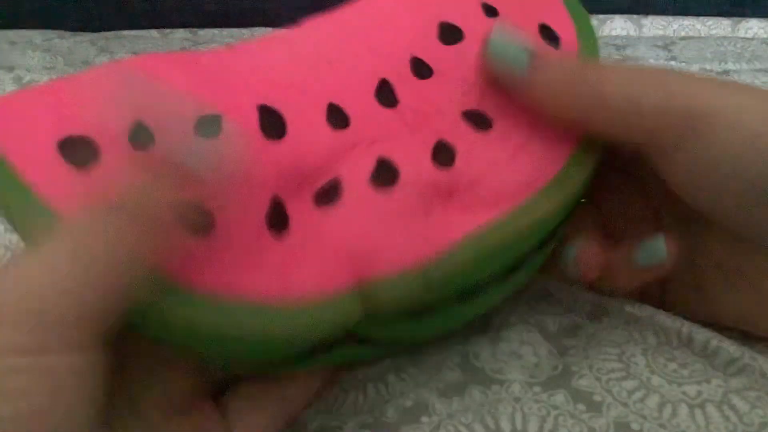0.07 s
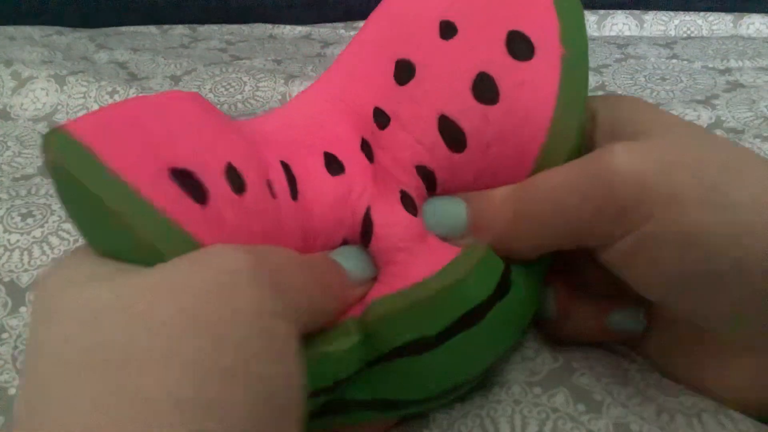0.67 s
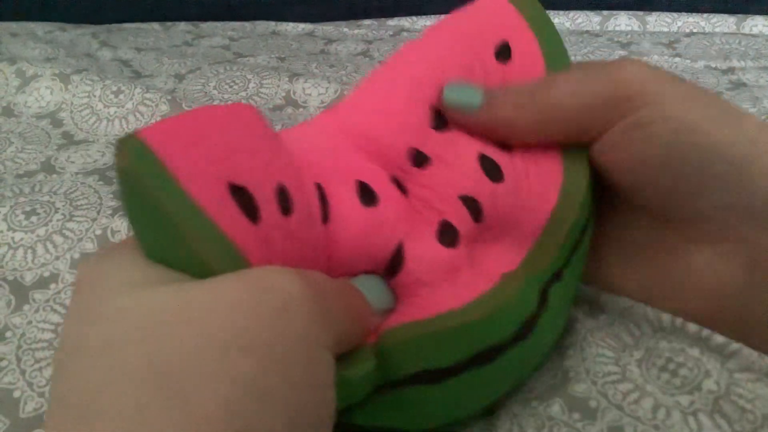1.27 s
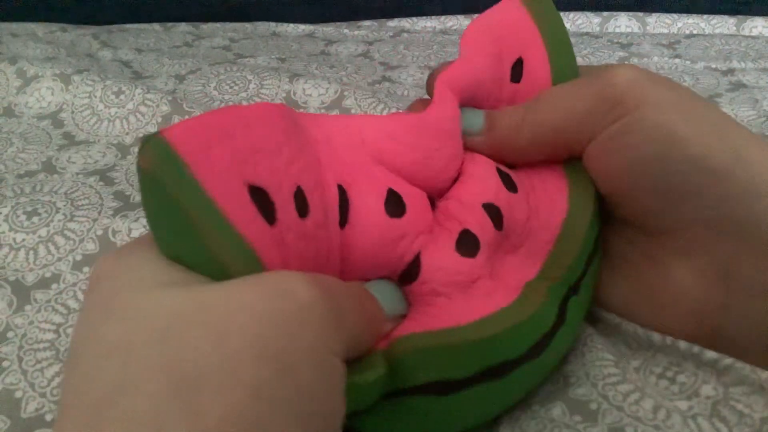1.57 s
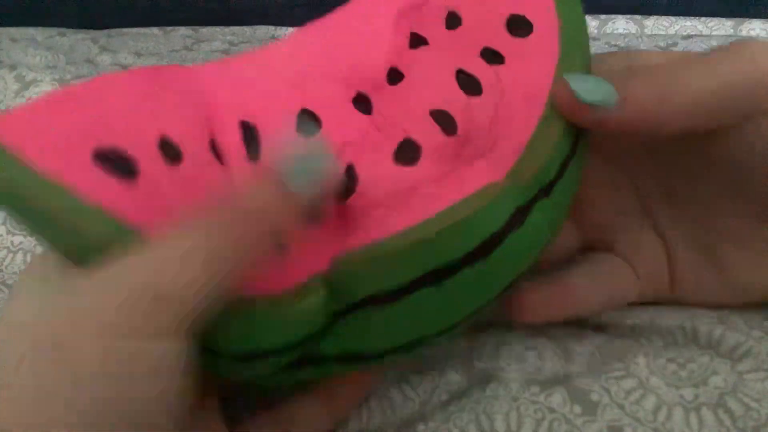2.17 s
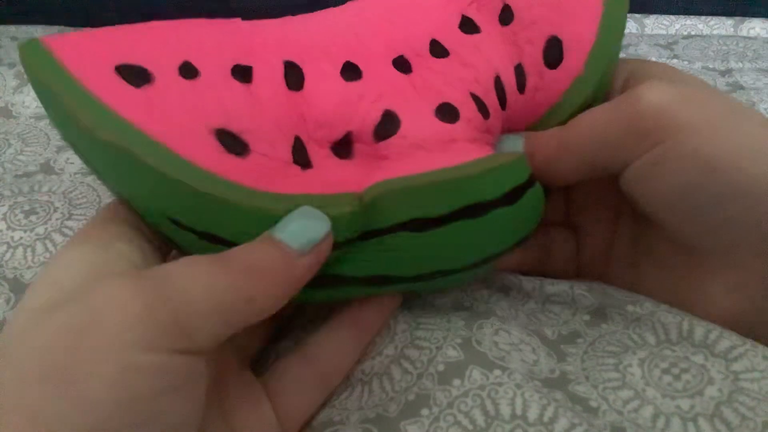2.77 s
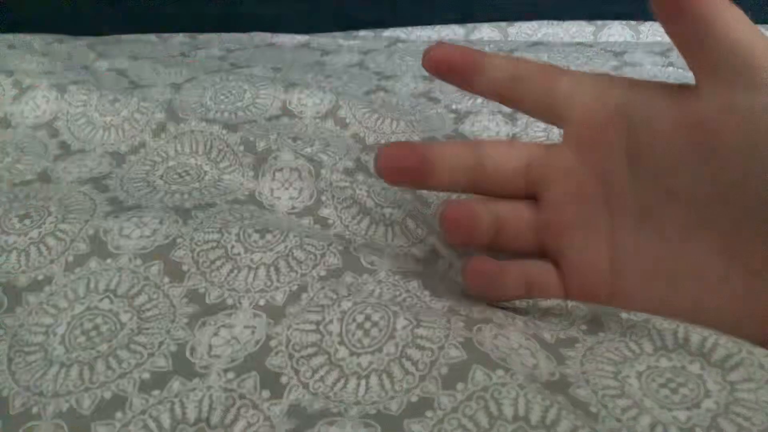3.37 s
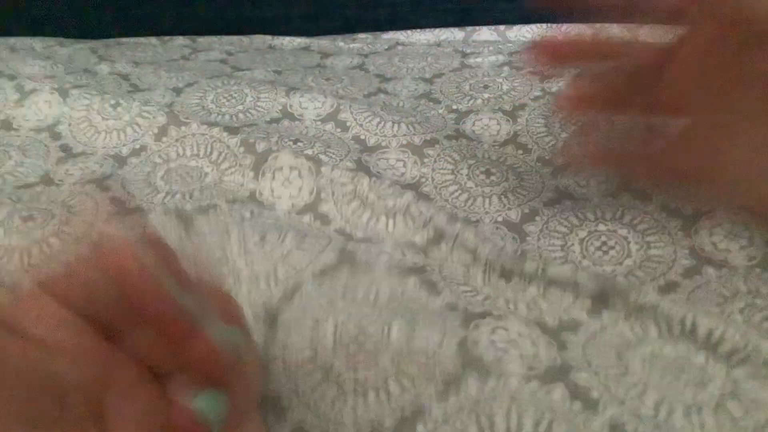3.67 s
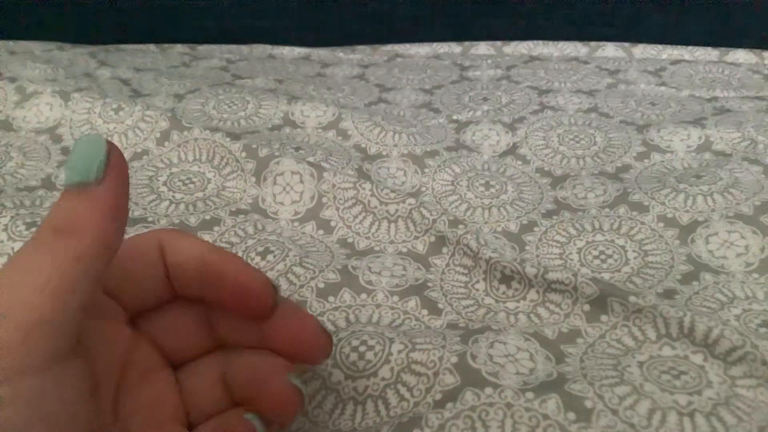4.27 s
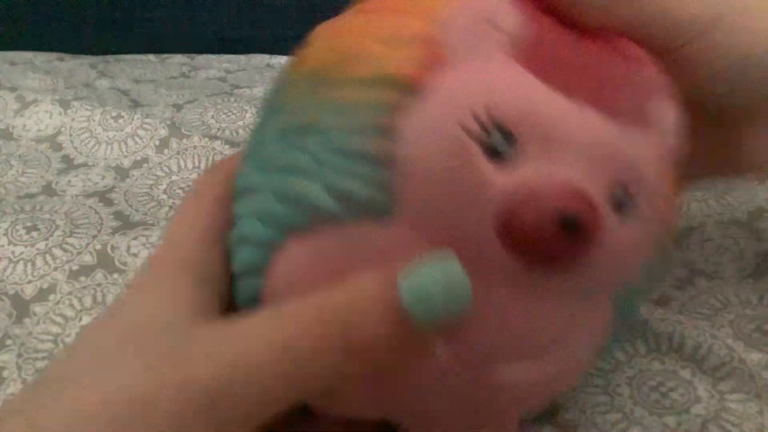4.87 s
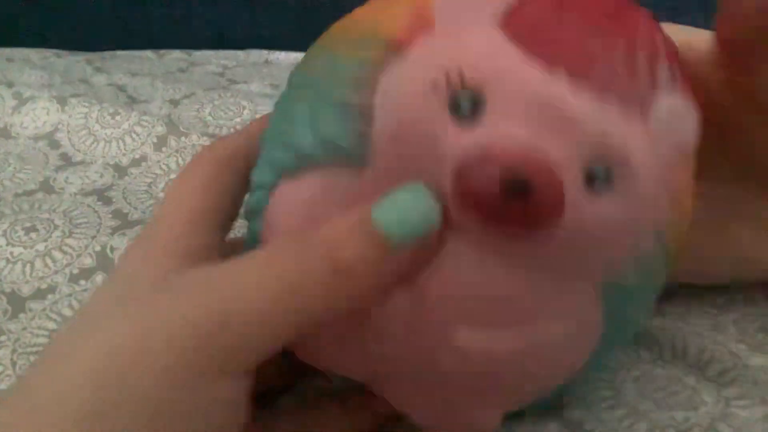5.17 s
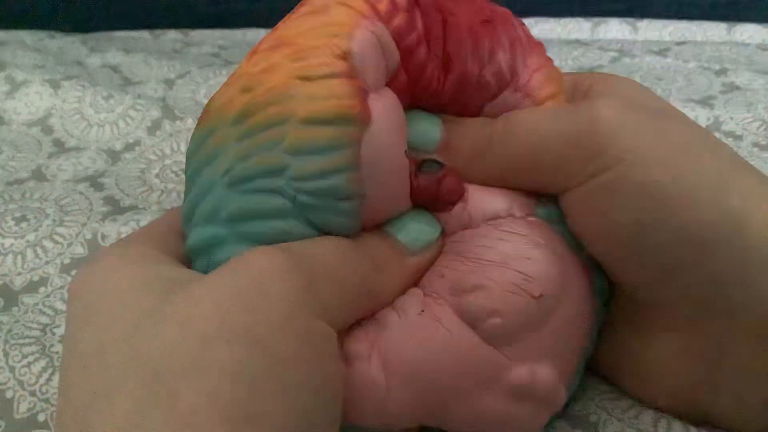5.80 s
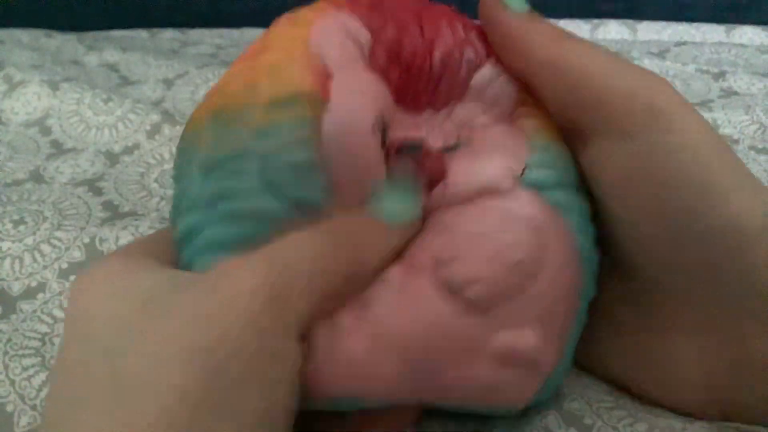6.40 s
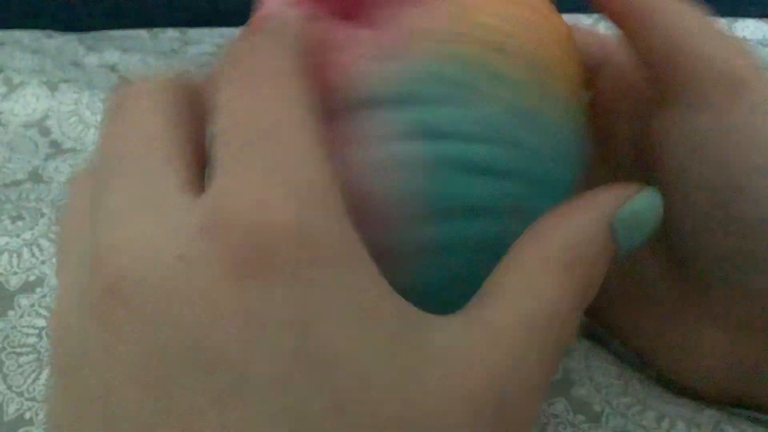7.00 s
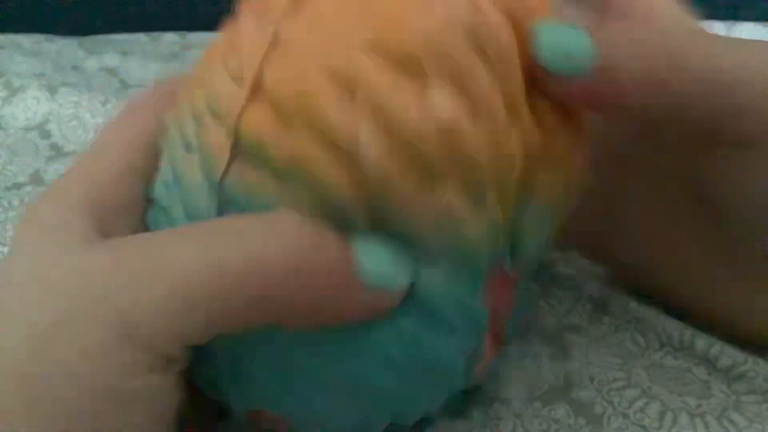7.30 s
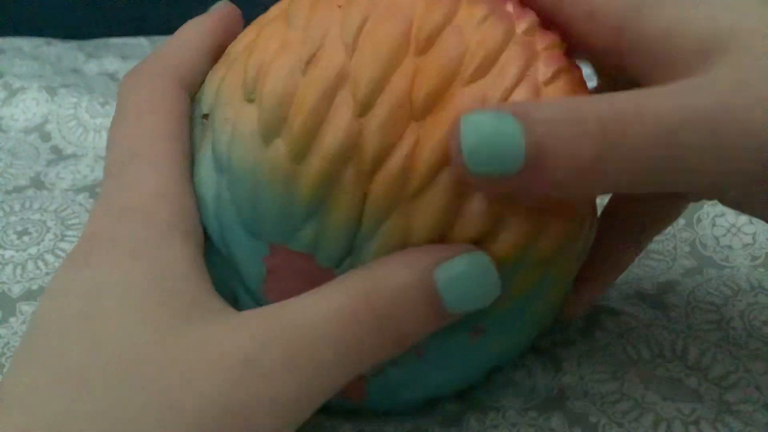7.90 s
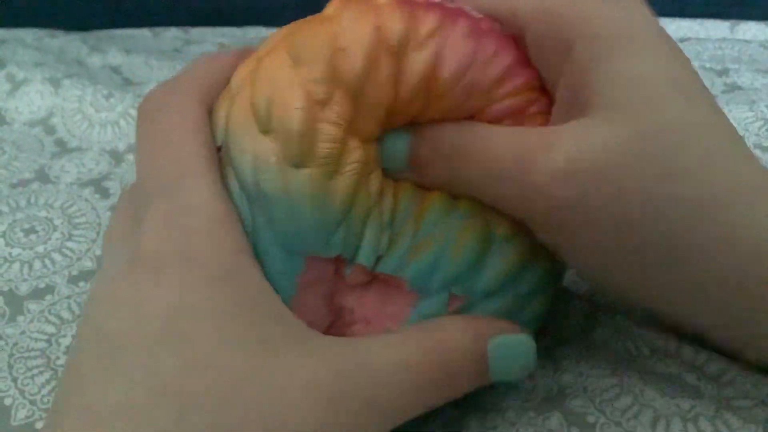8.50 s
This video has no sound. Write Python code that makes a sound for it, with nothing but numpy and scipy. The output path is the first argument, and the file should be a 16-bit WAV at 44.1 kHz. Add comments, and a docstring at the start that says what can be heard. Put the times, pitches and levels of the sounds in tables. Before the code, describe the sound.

Two hands rub and squeeze a soft foam toy over a cloth-covered bed, close to the microphone in a small, quiet room. Skin hisses in uneven swells over a low foam murmur, and fingertips peel off with small pops and cracks. Near the middle come a few dull bumps and a brief lull. Then a second toy is squeezed and turned, with more rubbing, faint creaks and sticky snaps.

```python
"""Two hands rub, squeeze and turn soft foam toys over a cloth-covered bed, close to a mono microphone.
Skin hisses over the rubbery coat and the cloth, and the foam murmurs under the fingers. Fingertips
stick, slip and peel off with small pops and cracks; each slip runs through the toy as a short falling
chirp. Toys and hands land with dull bumps. Behind it all is the faint air of a small room."""
import sys
import numpy as np
from scipy import signal
from scipy.fft import rfft, irfft, next_fast_len
from scipy.io import wavfile

SR = 44100
rng = np.random.default_rng(int(sys.argv[2]) if len(sys.argv) > 2 else 0)


def transcribe(u):
    """Save the signal u as a 16-bit wav file named by the first command-line argument.

    u: samples, shape (n,) or (channels, n), limited to [-1, 1]; the rate is SR.
    q: integer samples, one column per channel.
    """
    v = np.clip(np.atleast_2d(u).T, -1, 1)
    q = np.round(v * 32767).astype(np.int16)
    wavfile.write(sys.argv[1], SR, q)


N = 381465
T = np.arange(N) / SR

# A hand slides over foam or cloth: start_s, length_s, rise_share, coarse_db, fine_above_coarse_db
SLIDES = [(-.058, 0.41, 0.56, -52.5, -4), (.252, 0.55, 0.37, -52, 0), (.537, 0.29, 0.68, -56.5, 3.5),
          (.794, 0.35, .28, -54.5, -2.5), (1.086, 0.35, 0.28, -57, -1.5), (1.332, 0.21, 0.13, -66, -4.5),
          (1.609, 0.4, 0.47, -52, -2.5), (1.947, 0.28, 0.17, -64, -6), (2.041, 0.26, 0.35, -54.5, -0.5),
          (2.207, 0.3, 0.5, -55, -2.5), (2.46, 0.38, 0.26, -56.5, -4.5), (2.74, 0.16, .5, -73, -6),
          (2.887, 0.25, 0.49, -58.5, -5.5), (3.121, 0.21, 0.56, -58.5, -3.5), (3.27, .2, 0.35, -60.5, -7.5),
          (3.488, 0.23, 1, -54.5, -4.5), (3.583, 0.39, 0.47, -50, -2), (3.873, 0.19, 0.86, -78, 3.5),
          (4.25, 0.18, 0.76, -65, -2.5), (4.425, 0.23, 0.88, -56, -3.5), (4.58, 0.18, 0.72, -58, -3),
          (4.648, 0.22, 0.79, -53.5, -1), (4.847, 0.35, 0.11, -55.5, -2.5), (5.097, 0.31, 0.56, -51, -0.5),
          (5.33, .2, 0.36, -55.5, -3), (5.428, 0.42, 0.41, -51, 1.5), (5.758, 0.53, 0.12, -64, -4),
          (5.922, 0.21, 0.61, -56, -3.5), (6.05, .22, .4, -74, 1), (6.22, 0.22, 0.46, -65.5, 3.5),
          (6.328, 0.2, 0.54, -53, -2), (6.44, 0.18, 0.31, -69, -1.5), (6.556, 0.37, 0.47, -53.5, -2),
          (6.77, 0.48, 0.42, -58, -1.5), (7.076, 0.41, 0.54, -52.5, -0.5), (7.416, 0.14, 0.36, -57, 3),
          (7.513, 0.15, 0.49, -55, -0.5), (7.62, 0.4, 0.38, -61.5, 0), (7.946, 0.27, 0.43, -57.5, -3),
          (8.138, 0.44, 0.066, -61.5, -6), (8.442, 0.25, 0.48, -57.5, -2.5)]
# Fingers press the foam and let go: start_s, length_s, rise_share, pressure_db, sway_above_pressure_db
SQUEEZES = [(-.026, 0.38, 0.36, -59.5, 3), (.29, 0.31, 0.34, -55.5, 1), (.561, 0.38, 0.44, -57.5, 1.5),
            (.833, 0.25, 0.13, -54.5, 1.5), (1.119, 0.22, .75, -57.5, 5), (1.27, 0.64, .3, -70.5, 4),
            (1.636, 0.39, 0.3, -57, 2.5), (1.999, 0.45, 0.31, -58.5, 3), (2.47, 0.33, 0.16, -64, 2),
            (2.93, 0.39, 0.21, -66.5, 3), (3.15, 0.44, 0.27, -59, 1), (3.31, 0.078, 0.48, -52.5, -10),
            (3.62, 0.093, 0.28, -46, 0), (3.6, .42, 0.27, -53, 2.5), (4.08, 0.39, 0.34, -65.5, 2.5),
            (4.43, 0.34, 0.83, -57, -4.5), (4.742, 0.37, .24, -51.5, 2), (5.097, 0.4, 0.29, -52.5, -.5),
            (5.28, 0.56, 0.69, -52.5, -5.5), (5.68, 0.31, 0.79, -57, 0.5), (5.95, 0.23, 0.29, -55.5, -4),
            (6.29, 0.27, 0.52, -54.5, -2), (6.59, 0.64, .16, -54, -1.5), (7.08, 0.79, 0.2, -54, -1.5),
            (7.5, 0.2, 0.65, -56, 4.5), (7.722, 0.24, 0.55, -55.5, 8), (7.98, .34, 0.21, -50, -4.5),
            (8.3, 0.13, 0.36, -65.5, 8), (8.42, .14, 0.34, -61.5, 6), (8.52, 0.21, 0.55, -54, -4)]
# The tone of sliding skin, pressed foam, swaying foam and one slip: frequency_hz, level_db
HISS_TONE = [(150, -37), (500, 3), (1000, 0.5), (1400, 0.5), (1750, -0.5), (2200, 1), (3300, 0),
             (4800, 1.5), (6500, -0.5), (7700, 0), (9800, 0), (12300, -5.5), (14000, -3.5), (15600, -3.5)]
FOAM_TONE = [(60, -27), (150, 2.5), (200, 4), (280, 0.5), (370, 1.5), (470, -0.5), (570, -2), (720, -6),
             (1000, -15), (1800, -55), (5000, -54)]
SWAY_TONE = [(20, -42), (35, -35), (50, -8), (70, -0.5), (125, -4.5), (190, -11.5), (320, -25.5),
             (900, -47)]
SLIP_TONE = [(30, -40), (70, -4), (150, -1.5), (300, 3), (550, 3.5), (1000, -5), (2200, -6.5), (4500, -7.5),
             (7000, -19.5), (12000, -29), (15600, -4)]
# A fingertip breaks loose: time_s, level_db, brightness_hz
SLIPS = [(.3976, -44, 1200), (.4083, -39.5, 1000), (.6908, -48.5, 2000), (.8046, -44, 3500),
         (.8255, -45, 7520), (.9128, -36.5, 3500), (1.6455, -51, 4000), (1.693, -26.5, 6880),
         (1.6938, -26.5, 5060), (1.6978, -30, 9000), (1.7253, -40, 3970), (1.885, -43.5, 1490),
         (1.9806, -45, 1100), (2.1217, -44.5, 3020), (2.1492, -28, 3320), (2.202, -32, 1660),
         (3.0001, -38.5, 4070), (3.0029, -39, 3440), (3.3407, -41, 650), (3.5112, -48.5, 5000),
         (3.526, -47.5, 4050), (3.6361, -37, 600), (3.6667, -31, 400), (3.6734, -35, 350),
         (3.767, -38.5, 350), (4.8147, -38, 1300), (4.8213, -42, 3930), (4.9307, -37.5, 600),
         (5.166, -41, 500), (5.1823, -44, 600), (5.2265, -33.5, 355), (5.414, -43.5, 1000),
         (5.4655, -45, 550), (5.6316, -43, 1200), (5.891, -50, 2000), (6.043, -37.5, 2530),
         (6.0571, -40, 2520), (6.0621, -39.5, 2000), (6.4052, -33, 7500), (6.4245, -27, 6980),
         (6.493, -41, 2800), (7.034, -42, 7020), (7.254, -42.5, 1600), (7.379, -38, 460), (7.452, -42, 700),
         (7.6042, -43, 3960), (7.623, -45, 2000), (7.7239, -48, 2500), (7.79, -48, 5060),
         (7.882, -42, 4900), (8.0152, -40, 800), (8.3061, -49, 6030), (8.3212, -43.5, 1400),
         (8.618, -40, 900), (8.6246, -14.5, 15300)]
# A fingertip skids in a run of slips: start_s, end_s, slips_per_s, level_db, hardest_at_share, brightness_hz
SKIDS = [(1.251, 1.2887, 78, -36, 1, 940), (2.735, 2.7913, 55, -47.5, 1, 2520),
         (6.3387, 6.392, 75, -27.5, 0.4, 3150), (8.56, 8.601, 129, -39, 0.9, 1600)]
# A thumb drags in quick small slips: start_s, end_s, slips_per_s, level_db, brightness_hz
CREAKS = [(.385, 0.471, 124, -50, 750), (2.521, 2.595, 190, -55.5, 600), (5.379, 5.489, 101, -51.5, 800),
          (6.635, 6.86, 70, -66, 900), (7.442, 7.527, 150, -55, 900), (7.827, 7.896, 110, -60, 2500),
          (8.011, 8.288, 121, -56.5, 1100)]
# Sticky skin peels off the coat: release_s, level_db, build_up_s
PEELS = [(.918, -41.5, 0.014), (1.697, -39, 0.0021), (1.7019, -31.5, 0.0012), (2.152, -34, 0.0033),
         (2.168, -52, .01), (2.775, -68, 0.021), (3.005, -41.5, 0.0064), (3.346, -50, 0.01),
         (3.53, -67, 0.0064), (3.673, -41.5, 0.0044), (4.825, -44.5, 0.022), (6.045, -47, 0.0054),
         (6.067, -44.5, 0.009), (6.429, -44, .003), (7.625, -66, .015), (7.87, -62, 0.045),
         (8.603, -42.5, 0.0069), (8.626, -34.5, 0.0019)]
# An air pocket opens between skin and foam: time_s, level_db, pitch_hz
POPS = [(.4125, -38, 448), (1.2660, -43, 623), (1.2785, -37, 624), (2.535, -44, 548), (2.555, -44, 600),
        (3.6428, -27, 304), (4.1, -44, 587), (5.2272, -26, 786), (5.4705, -35, 482), (5.8922, -45.5, 508),
        (6.4268, -25, 595), (6.5650, -49, 557), (8.6037, -30.5, 482), (8.6282, -31.5, 475)]
# The coat snaps free of the skin: start_s, crack_db, ring_db
CRACKS = [(.9138, -38, -32), (1.6925, -25, -36), (1.694, -34, -36), (1.6988, -35, -49),
          (2.1487, -26, -37.5), (3.0020, -33, -30.5), (6.0430, -45, -40.5), (6.424, -23.5, -31.5),
          (7.0335, -44, -54), (7.8825, -51, -46.5), (8.6238, -32, -36)]
# The notes the tight coat rings with: pitch_hz, level_db, ring_s (time to fade by 60 dB)
COAT_NOTES = [(720, 0, 0.012), (1400, -2, 0.018), (2254, 2.5, 0.0078), (2900, -15, 0.0035),
              (4700, -6.5, 0.0079)]
# A hand or toy bumps the foam or the bed: peak_s, level_db, pitch_hz
BUMPS = [(.095, -45, 111), (.336, -42.5, 93), (.448, -42, 98), (.926, -42, 131), (.975, -43, 122),
         (1.289, -47, 103), (1.709, -30, 140), (1.909, -43.5, 90), (2.179, -37.5, 79), (3.019, -39, 94),
         (3.14, -50, 90), (3.656, -27, 134), (3.675, -31, 63.7), (3.691, -29, 178), (3.713, -36, 104),
         (3.773, -35, 137), (3.835, -33, 81.5), (4.825, -35, 116), (4.864, -33, 71), (4.971, -41, 114),
         (5.198, -34, 147), (5.248, -41, 117), (5.93, -43.5, 121), (6.079, -36, 107), (6.372, -35, 89),
         (6.406, -31.5, 76.5), (6.444, -39, 85), (6.464, -40.5, 77), (6.512, -43, 106), (7.058, -41.5, 89),
         (7.405, -31, 75), (7.814, -39, 101), (7.855, -38, 118), (7.897, -40, 113), (8.126, -41, 109),
         (8.642, -41, 102)]
# A dragging finger rasps in the hollow of the hand: peak_s, level_db, width_s, resonance_hz
RASPS = [(.51, -53.5, .05, 5400), (.9, -50, 0.046, 1400), (.89, -59, 0.039, 2130),
         (2.755, -64, 0.023, 1280), (3.0, -46.5, 0.02, 1400), (3.52, -72, 0.012, 2900),
         (4.028, -65, .003, 3900), (4.81, -52, 0.013, 2000), (7.47, -56.5, 0.036, 1470),
         (7.84, -58, 0.015, 1500), (8.332, -53, 0.0047, 1180)]
# A nail or dry fingertip skims the coat: peak_s, level_db, width_s
SIZZLES = [(.08, -48, .02), (.125, -52, .012), (.73, -50, 0.042), (2.14, -57, 0.061), (3.355, -50, 0.026),
           (4.975, -52, 0.015), (5.62, -49, 0.04), (6.04, -62, .008), (6.405, -53, 0.011),
           (6.44, -47, 0.022), (7.035, -56, .005), (7.615, -50, .015), (8.325, -60, .008), (8.6, -53, .03)]
# The far hand brushes among the other toys: peak_s, level_db, width_s
BRUSHES = [(4.18, -59, 0.044), (4.3, -57.5, 0.038), (4.36, -56.5, 0.031)]
# The tone of that brushing: frequency_hz, level_db
BRUSH_TONE = [(100, 2), (400, 10.5), (800, -2), (1300, -3.5), (2300, 1.5), (3400, -0.5), (5000, -9.5),
              (7500, -12.5), (10000, -27), (15600, -28)]
# Faint whistles from the foam: start_s, end_s, first_hz, last_hz, level_db
WHISTLES = [(1.329, 1.54, 445, 397, -64.5), (3.01, 3.17, 820, 746, -64), (6.061, 6.258, 775, 716, -62.5),
            (7.076, 7.243, 770, 765, -58)]
# How long a small furnished room rings: frequency_hz, ring_s (time to fade by 60 dB)
ROOM_RING = [(100, 0.37), (1000, 0.2), (5000, 0.18), (15000, 0.11)]
# The tone of still room air: frequency_hz, level_db
AIR_TONE = [(20, -5), (70, 14), (150, 20), (450, 3), (1000, -34), (4000, -34), (10000, -39), (15600, -27)]


def rubbing(split_hz=5500, flutter_db=0.96):
    """Sliding skin hisses: a coarse low layer and a fine high one swell with each move of the hand."""
    coarse_db, fine_db = hand_moves(SLIDES, resting_db=(-82, -83.5), roundness=1.25)
    friction = colour(rng.standard_normal(N) + 0.47 * grains(2500, 4.3), HISS_TONE)
    fine = signal.sosfiltfilt(signal.butter(2, split_hz, "high", fs=SR, output="sos"), friction)
    hiss = unit(friction - fine) * amp(coarse_db - 0.85) + unit(fine) * amp(fine_db + 0.9)
    return hiss * amp(flutter_db * wander(90))


def squeezing(lurch_db=2):
    """Small catches sound in the pressed foam, and the hands sway it with a low rumble."""
    pressure_db, sway_db = hand_moves(SQUEEZES, resting_db=(-76, -72), roundness=0.85)
    catches = unit(signal.oaconvolve(grains(170, 5.9), chirp(2500), "same"))
    foam = colour(rng.standard_normal(N), FOAM_TONE) + 0.83 * colour(catches, FOAM_TONE)
    rumble = colour(rng.standard_normal(N), SWAY_TONE) * amp(sway_db - 1 + lurch_db * wander(35))
    return unit(foam) * amp(pressure_db - 1.05) + rumble


def hand_moves(rows, resting_db, roundness):
    """Each move builds and eases off in one arch. Gives the levels of its two layers over time, in dB."""
    first_power, second_power = amp(resting_db) ** 2
    for start_s, length_s, rise_share, db, above_db in rows:
        peak_s = start_s + length_s * np.clip(rise_share, .05, .95)
        ramp = np.interp(T, [start_s, peak_s, start_s + length_s], [0, 1, 0])
        arch = np.sin(np.pi / 2 * ramp) ** roundness
        first_power = first_power + (arch * amp(db)) ** 2
        second_power = second_power + (arch * amp(db + above_db)) ** 2
    return 10 * np.log10([first_power, second_power])


def slips(scatter=0.54, scatter_s=0.0038, direct_hz=8010):
    """Fingertips slip, once or in runs. Waves scattered inside the toy roughen each chirp."""
    out, t = np.zeros(N), np.arange(SR // 100) / SR
    for time_s, db, bright_hz in [*SLIPS, *skids()]:
        echoes = rng.standard_normal(len(t)) * np.exp(-t / scatter_s)
        paths = (t == 0) + scatter * echoes / np.linalg.norm(echoes)
        # The brightest snaps come straight through the air, so they hardly lag.
        wave = chirp(bright_hz, lag_ms=1.5 / (1 + (bright_hz / direct_hz) ** 4))
        add(out, time_s - len(wave) / 2 / SR, amp(db) * signal.fftconvolve(wave, paths))
    return out


def chirp(bright_hz, lag_ms=1.5, size=4096):
    """One slip: high bending waves cross the toy first, low ones trail. At 1 kHz the delay is lag_ms."""
    hz = np.fft.rfftfreq(size, 1 / SR) + 1
    gain = amp(look_up(SLIP_TONE, hz)) / np.sqrt(1 + (hz / bright_hz) ** 3.8)
    phase = 2 * np.pi * (lag_ms * np.log(hz) + rng.random())
    wave = np.roll(irfft(gain * np.exp(-1j * phase)), size // 2)  # put the slip in the middle
    return wave / abs(wave).max()


def skids(ease_db=8):
    """A skid is a row of evenly spaced slips, weaker the further they are from its hardest point."""
    for start_s, end_s, per_s, db, hardest_at, bright_hz in SKIDS:
        for share in np.linspace(0, 1, round((end_s - start_s) * per_s) + 1):
            yield start_s + share * (end_s - start_s), db - ease_db * abs(share - hardest_at), bright_hz


def creaks(jitter=.25, uneven_db=2):
    """A dragging thumb sticks and slips at an uneven beat."""
    out = np.zeros(N)
    pace = np.exp(jitter * wander(120))
    force = amp(uneven_db * wander(150))
    for start_s, end_s, per_s, db, bright_hz in CREAKS:
        span = slice(round(start_s * SR), round(end_s * SR))
        slip_count = np.floor(np.cumsum(per_s * pace[span]) / SR)
        ticks = np.diff(slip_count, prepend=0) * force[span]
        creak = unit(signal.fftconvolve(ticks, chirp(bright_hz), "same"))
        add(out, start_s, amp(db) * creak * signal.windows.tukey(len(ticks), .2))
    return out


def peels(let_go_s=0.00021, dull_hz=8000):
    """Crackle swells as the sticky patch shrinks, and stops when the skin lets go."""
    crackle = colour(grains(3500, 3.5), HISS_TONE)
    crackle = unit(signal.lfilter(*signal.butter(1, dull_hz, fs=SR), crackle))
    level, t = np.zeros(N), np.arange(-SR // 8, SR // 32) / SR
    for release_s, db, build_up_s in PEELS:
        add(level, release_s + t[0], amp(db) * np.exp(np.minimum(t / build_up_s, -t / let_go_s)))
    return crackle * level


def pops(width_cycles=0.91, fall=0.125):
    """An air pocket gives a short round pop, falling in pitch as it opens."""
    out, t = np.zeros(N), np.arange(-SR // 80, SR // 80) / SR
    for time_s, db, hz in POPS:
        pitch_hz = hz * np.exp(-fall * np.clip(t * hz, -2, 2))
        turns = np.cumsum(pitch_hz) / SR + rng.random()
        level = amp(db) * np.exp(-(t * hz / width_cycles) ** 2)
        add(out, time_s + t[0], level * np.sin(2 * np.pi * turns))
    return out


def cracks(fade_s=0.001):
    """The coat snaps free with a bright burst, then rings until the foam damps it."""
    out, t = np.zeros(N), np.arange(SR // 40) / SR
    for start_s, crack_db, ring_db in CRACKS:
        burst = np.diff(rng.standard_normal(len(t) + 1)) * np.exp(-t / fade_s)
        ring = sum(amp(db - 60 * t / ring_s) * np.sin(2 * np.pi * hz * rng.uniform(.96, 1.04) * t)
                   for hz, db, ring_s in COAT_NOTES)
        add(out, start_s, amp(crack_db) * burst / abs(burst).max() + amp(ring_db) * ring)
    return out


def bumps(rise_cycles=1.09, sag=0.38):
    """A soft mass rocks a few times, its pitch sagging as it settles."""
    out, t = np.zeros(N), np.arange(SR // 8) / SR
    for peak_s, db, hz in BUMPS:
        age = t * hz / rise_cycles  # 1 at the loudest moment
        turns = np.cumsum(hz * np.exp(sag * (1 - age))) / SR + rng.random()
        level = amp(db - 1) * (age * np.exp(1 - age)) ** 2
        add(out, peak_s - rise_cycles / hz, level * np.sin(2 * np.pi * turns))
    return out


def rasps(sharpness=2.0):
    """A finger drags, and the hollow of the hand brings out one broad band of the grainy noise."""
    out = np.zeros(N)
    friction = rng.standard_normal(N) + grains(900, 5.3)
    for peak_s, db, width_s, hz in RASPS:
        band = unit(signal.lfilter(*signal.iirpeak(hz, sharpness, fs=SR), friction))
        out += band * swells([(peak_s, db, width_s)])
    return out


def sizzles(above_hz=12500):
    """A nail or dry fingertip skims the coat with a thin, very high hiss."""
    high_pass = signal.butter(2, above_hz, "high", fs=SR, output="sos")
    friction = rng.standard_normal(N) + grains(1500, 1.9)
    return unit(signal.sosfilt(high_pass, friction)) * swells(SIZZLES)


def brushes():
    """The far hand brushes the other toys; distance makes it duller."""
    friction = rng.standard_normal(N) + 0.65 * grains(1200, 3.5)
    return colour(friction, BRUSH_TONE) * swells(BRUSHES)


def whistles(fuzz_hz=45):
    """Thin gliding tones, likely air in the pores of the foam, made fuzzy by its swirling."""
    out = np.zeros(N)
    noise = rng.standard_normal(N) + 1j * rng.standard_normal(N)
    flicker = signal.sosfilt(signal.butter(2, fuzz_hz, fs=SR, output="sos"), noise)
    flow = 1 + flicker / np.std(flicker)
    for start_s, end_s, first_hz, last_hz, db in WHISTLES:
        air = flow[round(start_s * SR):round(end_s * SR)]
        turns = np.cumsum(np.linspace(first_hz, last_hz, len(air))) / SR
        tone = (air * np.exp(2j * np.pi * turns)).real
        add(out, start_s, amp(db) * unit(tone) * signal.windows.tukey(len(air), .5))
    return out


def room(sound, echo_s=0.00142, echo_gain=0.031, tail_db=-17):
    """The room adds one echo from a nearby surface and a weak, short tail."""
    hz, t, noise = signal.stft(rng.standard_normal(SR // 2), SR, nperseg=256)
    fade = amp(-60 * t / look_up(ROOM_RING, hz)[:, None])
    tail = signal.istft(noise * fade, SR, nperseg=256)[1]
    response = amp(tail_db) * tail / np.linalg.norm(tail)
    response[0] += 1  # the direct sound
    response[round(echo_s * SR)] += echo_gain
    return signal.oaconvolve(sound, response)[:N]


def room_air(level_db=-95):
    """Still air makes a very faint, low hush."""
    return amp(level_db) * colour(rng.standard_normal(N), AIR_TONE)


def grains(per_s, spread_db):
    """Tiny contacts break at random: many small clicks, a few large."""
    clicks = (rng.random(N) < per_s / SR) * rng.choice([-1, 1], N)
    return unit(clicks * amp(spread_db * np.minimum(rng.exponential(1, N), 4)))


def swells(rows):
    """The level of short, smooth strokes over time."""
    return sum(amp(db) * np.exp(-((T - peak_s) / width_s) ** 2) for peak_s, db, width_s in rows)


def wander(per_s):
    """A random curve that heads for a new value per_s times a second."""
    targets = rng.standard_normal(8192)
    return unit(np.interp(T * per_s, np.arange(len(targets)), targets))


def colour(sound, tone):
    """Shapes the lows and highs of a sound by a tone table, at an average level of 1."""
    size = next_fast_len(len(sound))
    gain = amp(look_up(tone, np.fft.rfftfreq(size, 1 / SR)))
    return unit(irfft(rfft(sound, size) * gain, size)[:len(sound)])


def look_up(table, hz):
    """Reads between the rows of a table, on a log-frequency scale."""
    row_hz, values = np.transpose(table)
    return np.interp(np.log(hz + 1), np.log(row_hz + 1), values)


def add(mix, start_s, sound):
    """Mixes a sound in at a given time."""
    part = mix[max(round(start_s * SR), 0):][:len(sound)]
    part += sound[:len(part)]


def amp(db):
    """Turns decibels into a gain."""
    return 10 ** (np.asarray(db) / 20)


def unit(sound):
    """Scales a sound to an average (rms) level of 1."""
    return sound / np.sqrt(np.mean(sound ** 2) + 1e-20)


def scene():
    """All the handling sounds in the room, the same in both channels."""
    sliding = rubbing() + squeezing() + sizzles() + brushes() + rasps() + creaks() + whistles()
    touches = slips() + pops() + peels() + cracks() + bumps()
    mono = room(sliding + touches) + room_air()
    return np.array([mono, mono])


def record(dry, low_cut_hz=50, high_cut_hz=15950):
    """The microphone drops the deepest bass and the highest treble."""
    thinned = signal.sosfilt(signal.butter(4, low_cut_hz, "high", fs=SR, output="sos"), dry)
    low_pass = signal.firwin(511, high_cut_hz, window=("kaiser", 9), fs=SR)
    return signal.oaconvolve(thinned, low_pass[None], "same")


dry = scene()
out = record(dry)
transcribe(out)
```